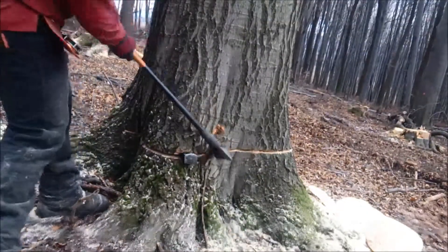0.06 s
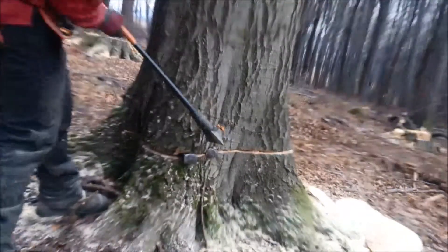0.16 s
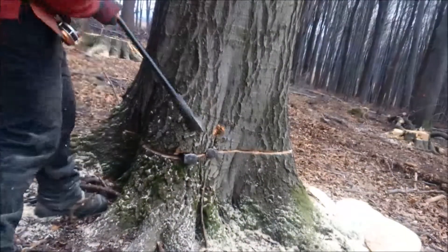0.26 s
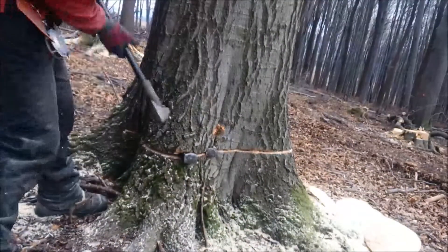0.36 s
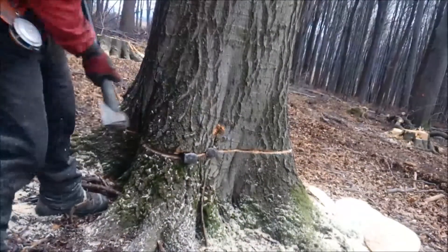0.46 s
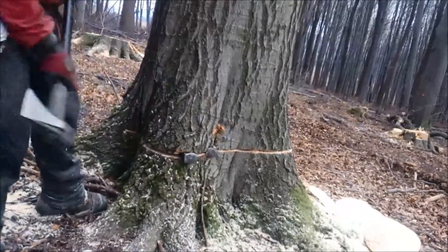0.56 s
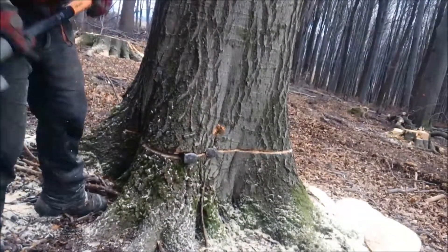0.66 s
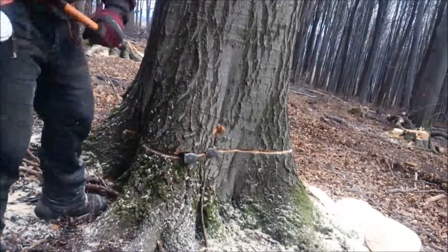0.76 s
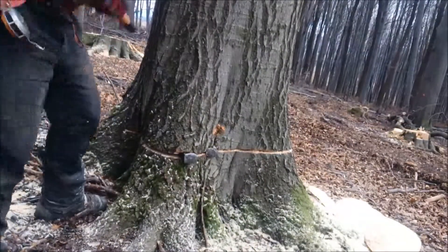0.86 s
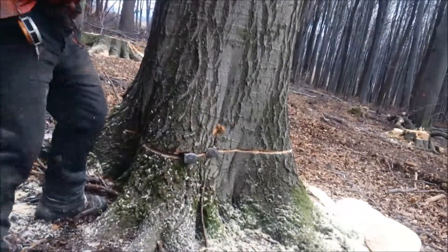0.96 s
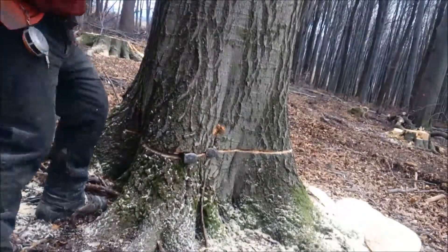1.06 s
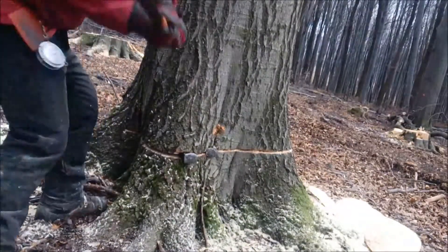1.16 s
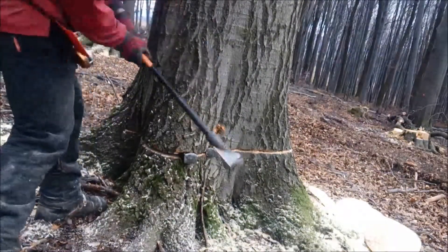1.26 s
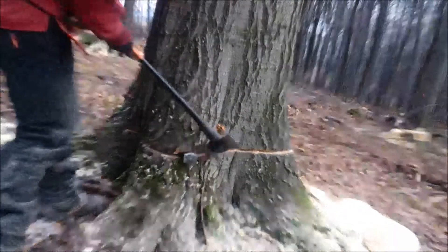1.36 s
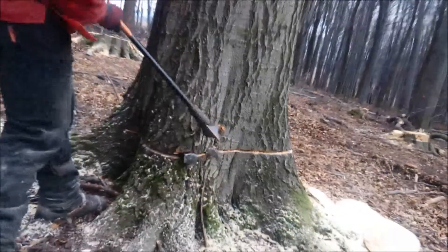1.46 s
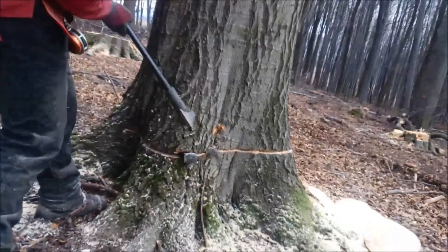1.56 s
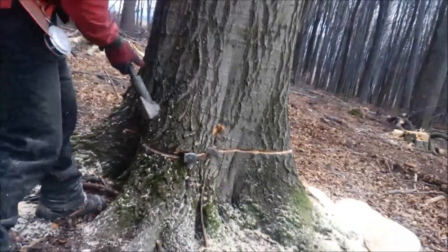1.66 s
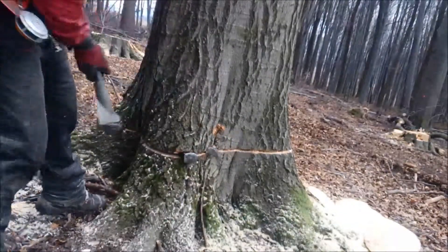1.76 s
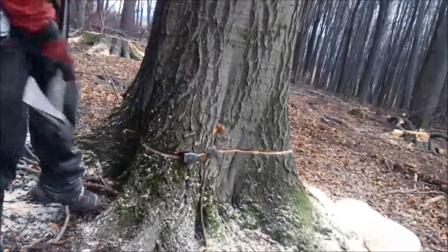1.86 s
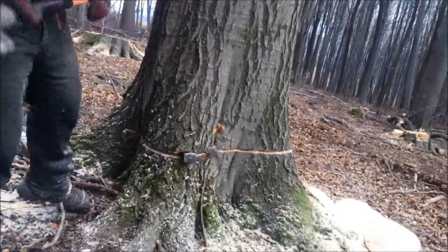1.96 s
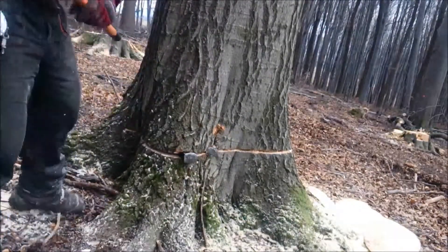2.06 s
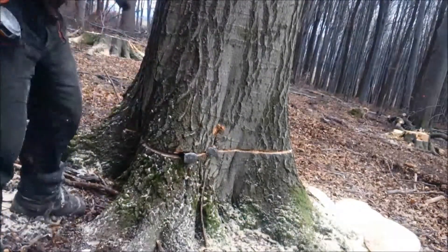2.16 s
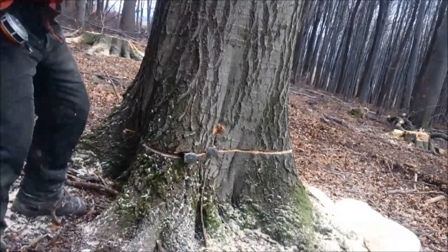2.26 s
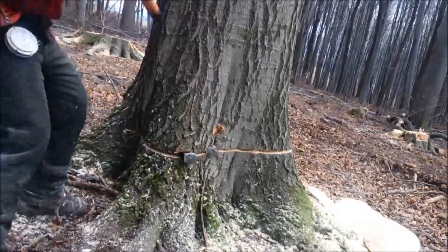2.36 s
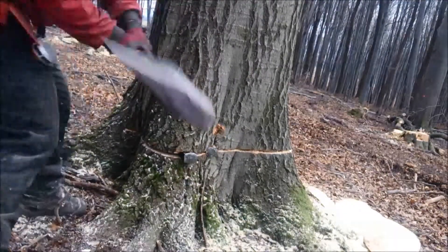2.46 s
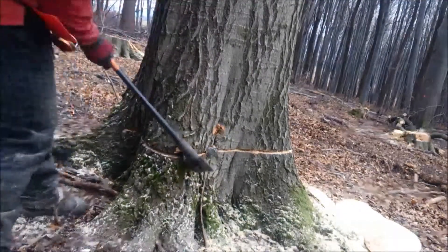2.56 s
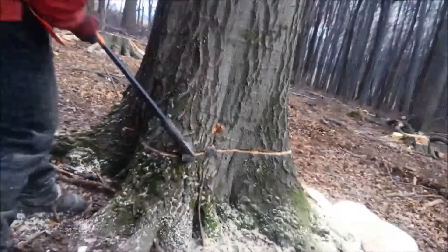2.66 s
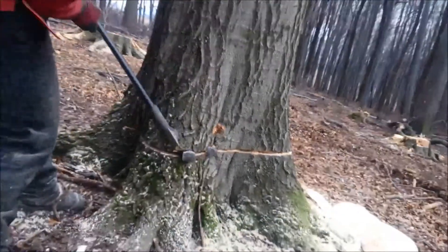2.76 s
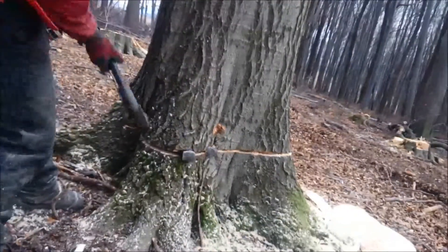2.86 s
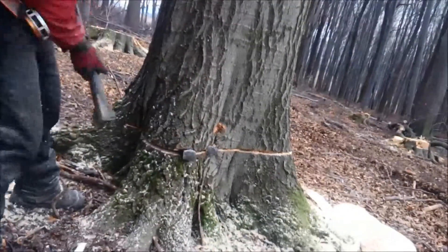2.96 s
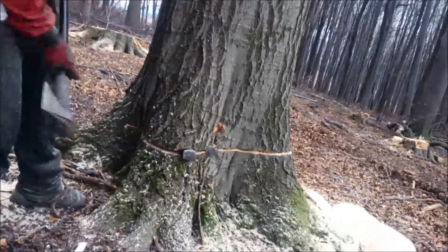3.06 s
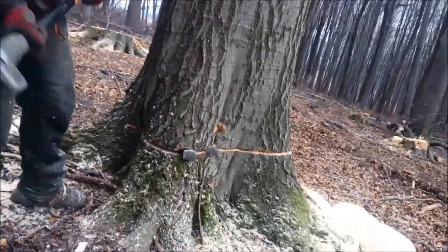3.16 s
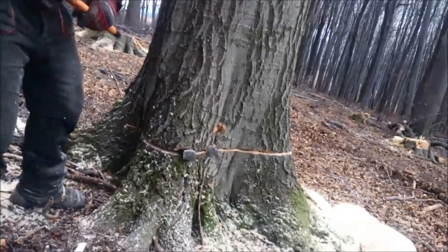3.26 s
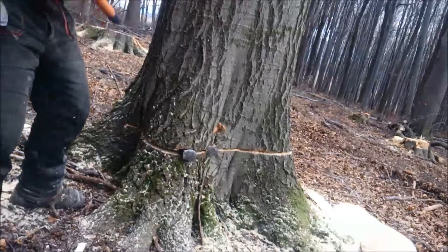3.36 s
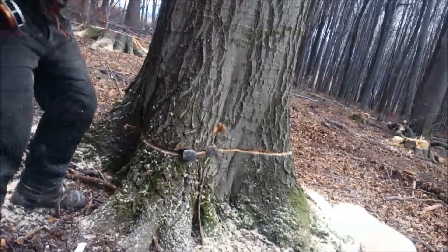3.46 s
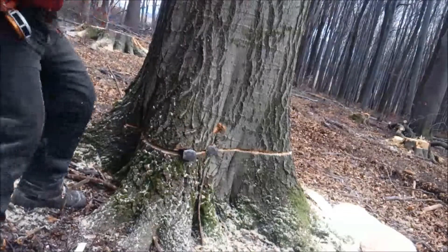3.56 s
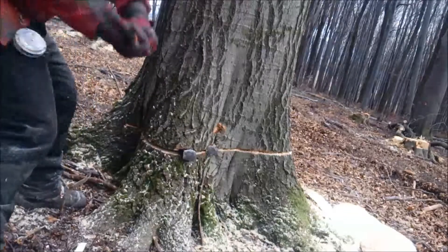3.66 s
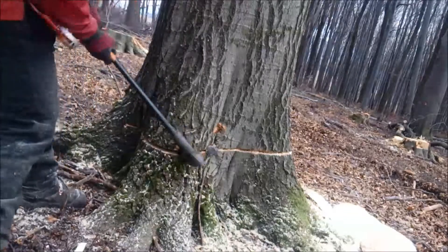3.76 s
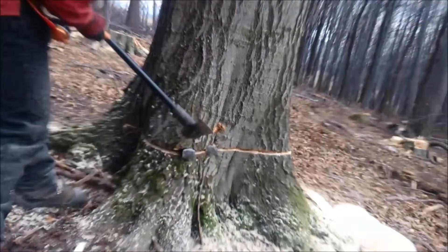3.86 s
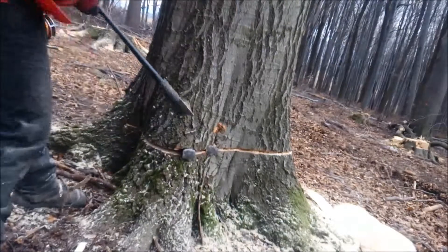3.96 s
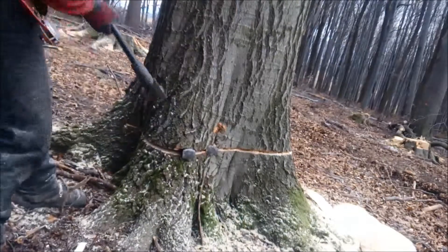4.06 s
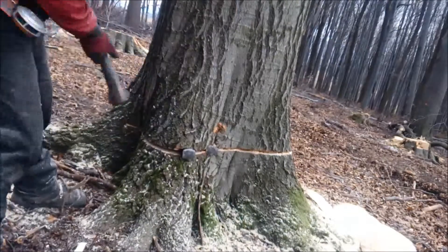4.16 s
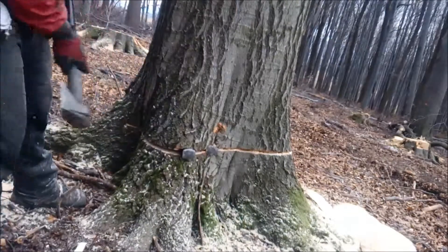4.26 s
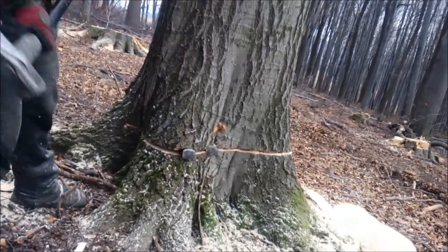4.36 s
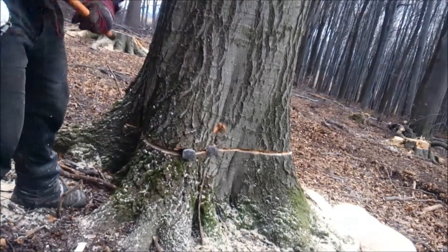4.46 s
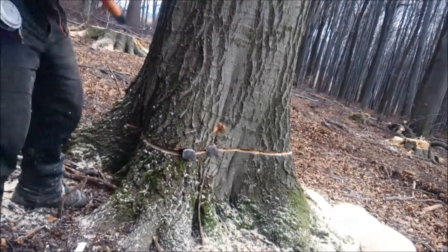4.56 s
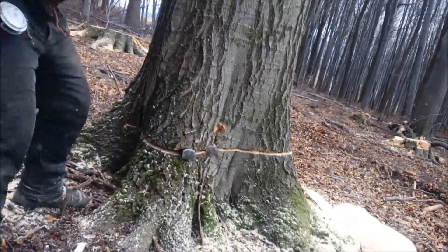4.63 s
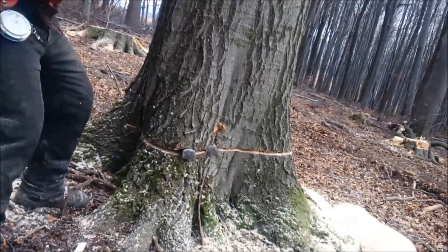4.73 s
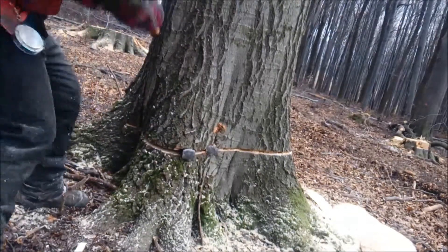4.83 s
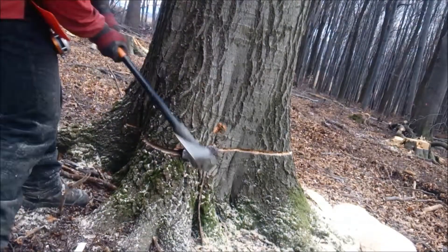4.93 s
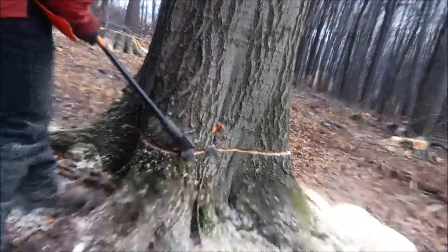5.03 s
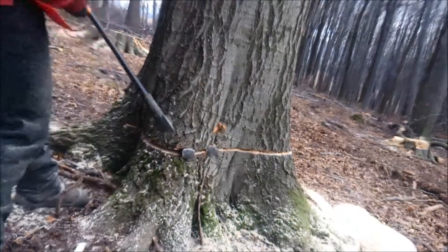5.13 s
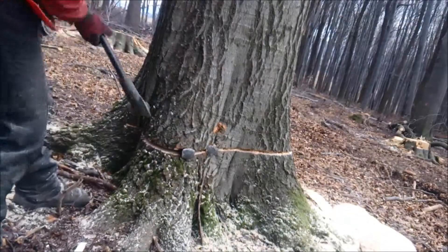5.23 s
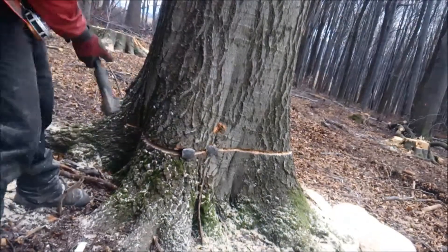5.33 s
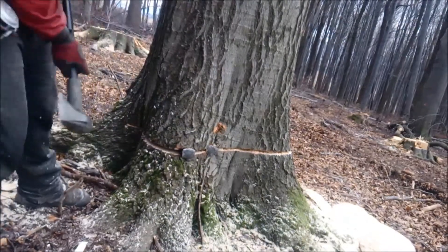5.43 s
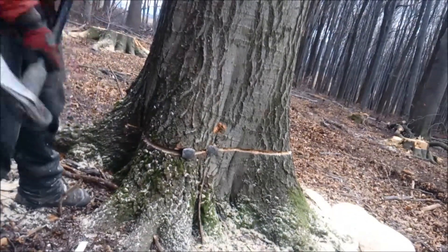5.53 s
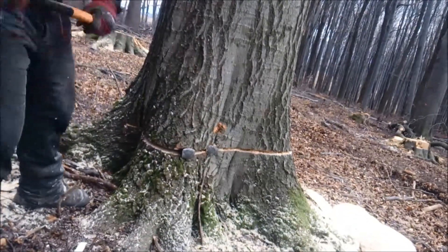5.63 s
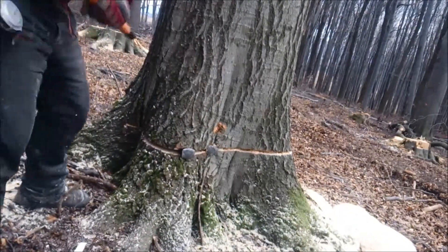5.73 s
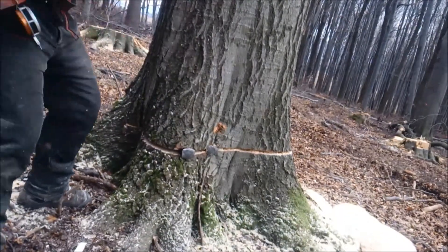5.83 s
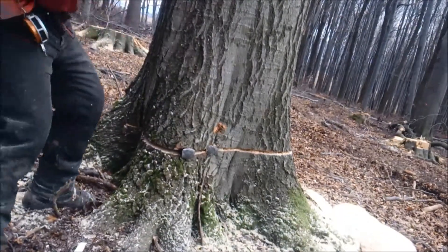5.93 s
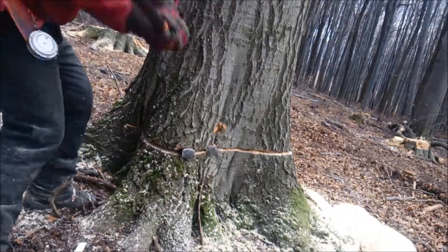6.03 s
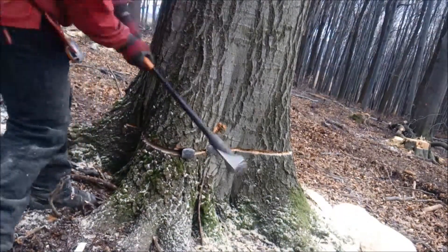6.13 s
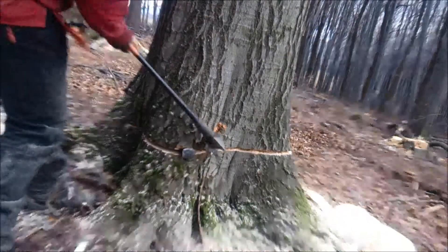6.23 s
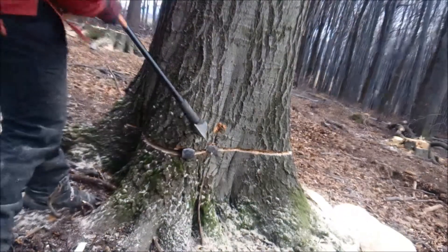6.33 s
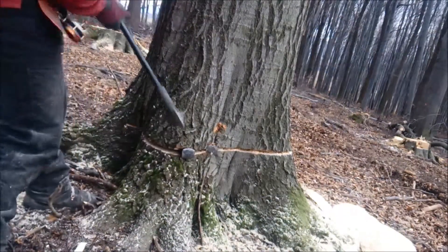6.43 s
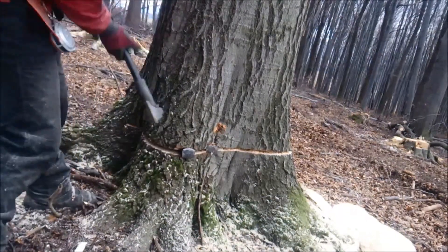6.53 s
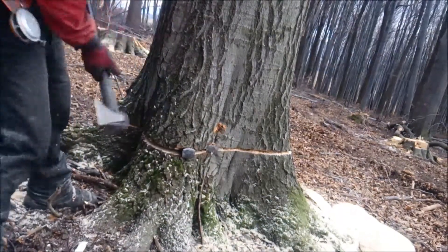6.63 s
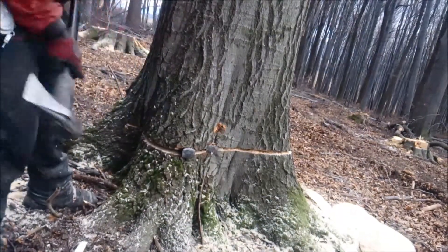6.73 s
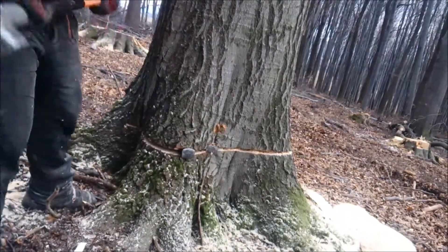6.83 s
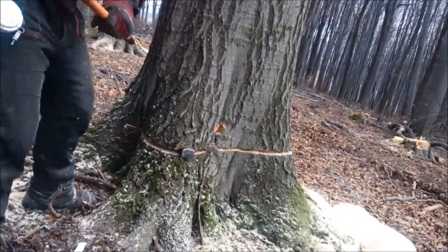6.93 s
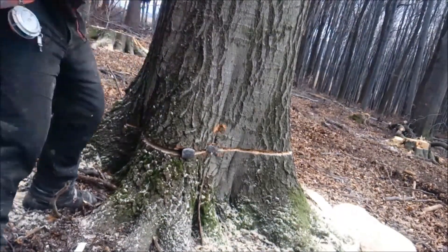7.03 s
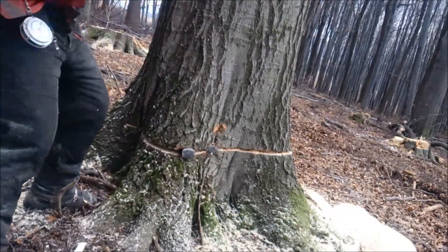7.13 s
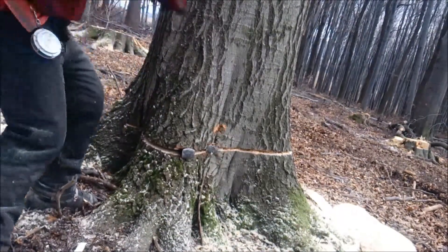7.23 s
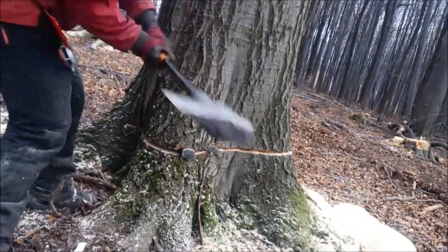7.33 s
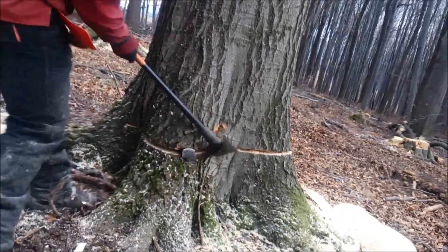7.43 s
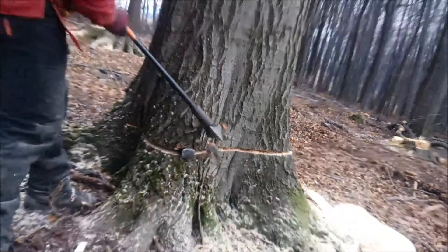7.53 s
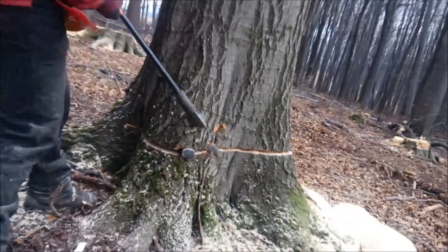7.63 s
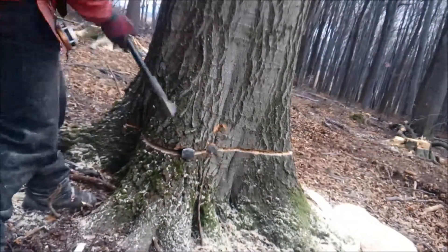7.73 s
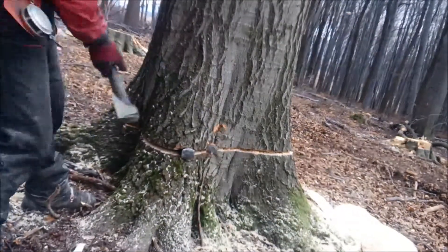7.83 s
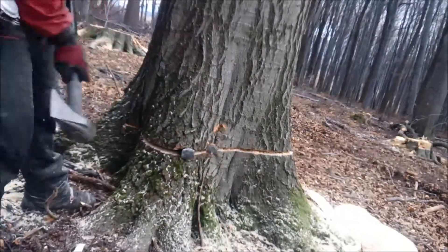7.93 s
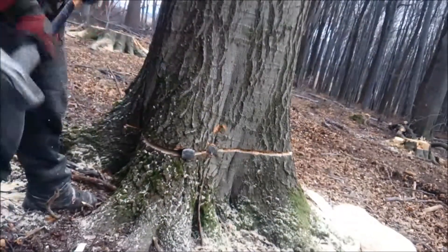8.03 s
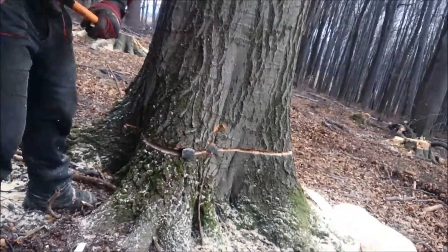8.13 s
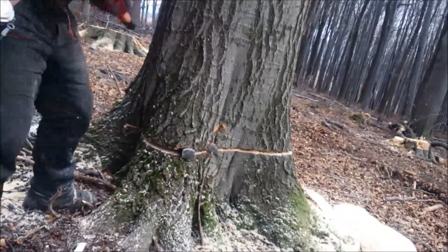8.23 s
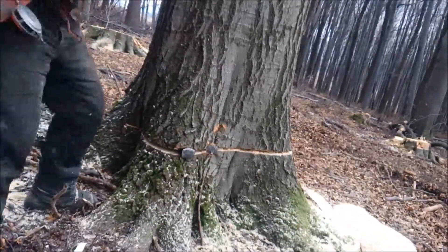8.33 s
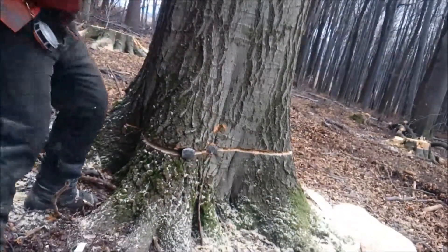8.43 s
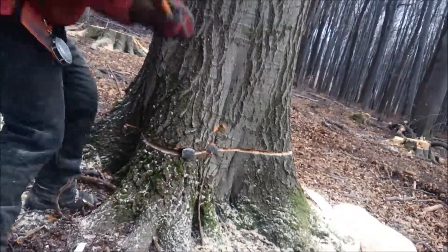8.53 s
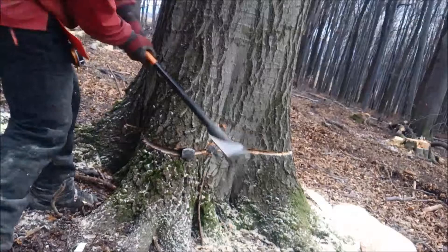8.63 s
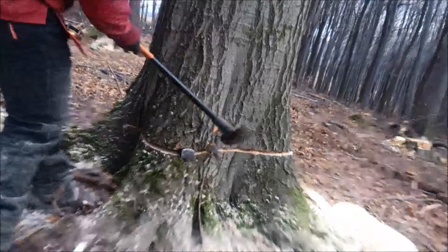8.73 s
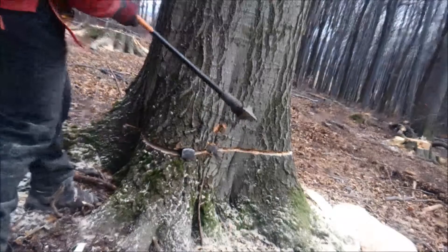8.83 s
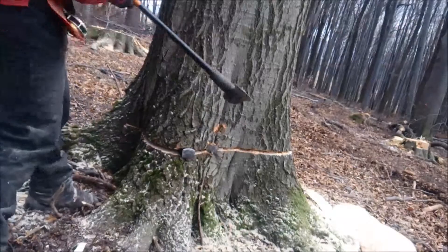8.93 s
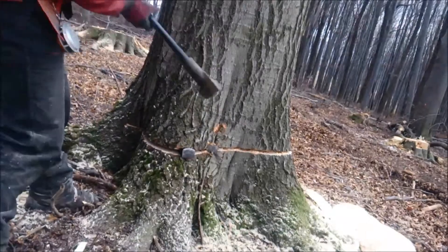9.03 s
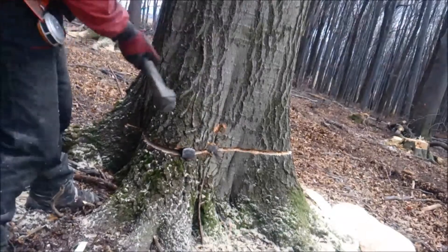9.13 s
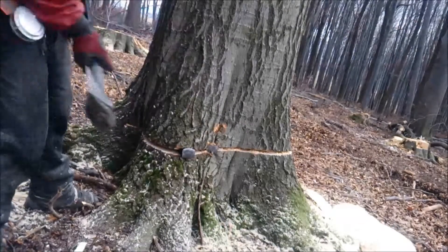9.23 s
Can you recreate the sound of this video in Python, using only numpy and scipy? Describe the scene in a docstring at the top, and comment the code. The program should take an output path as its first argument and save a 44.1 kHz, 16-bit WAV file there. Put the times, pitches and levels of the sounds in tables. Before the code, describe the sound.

Eight evenly spaced axe strikes on steel wedges in a trunk, some ringing brighter, others duller. Each is a distorted close crack with wooden body and a short shimmering ring, followed by diffuse woodland reverberation. Soft cloth hiss rises before each swing, with faint clicks and dry leaf crackles in between. Air thumps the microphone, and low gusts become stronger on the right after six seconds.

```python
"""Felling wedges driven into a beech trunk

Eight blows of a heavy axe in a bare forest, close to a stereo microphone that overloads on each.
Decaying noise makes the crack, short sine modes the trunk's thud, beating sine modes the ringing steel.
Each blow's contacts and first clang are convolved with a noise echo: the forest scatters them for over a second.
Shaped noise makes the air pushed by each swing, the rubbing sleeves, the clicks of gear, haft and dry leaves,
one knock of the rebounding axe, the gusts that buffet the right port and the still air.
"""
import sys
import numpy as np
from scipy import signal
from scipy.fft import rfft, irfft, next_fast_len
from scipy.io import wavfile

SR = 44100
rng = np.random.default_rng(int(sys.argv[2]) if len(sys.argv) > 2 else 0)


def inscribe(sig):
    """Save sig as 16-bit PCM at rate SR to the path in sys.argv[1].

    A 1-D sig is mono; a 2-D sig holds one channel per row.
    Samples are clipped to [-1, 1] before scaling.
    """
    pcm = np.round(np.clip(np.atleast_2d(sig).T, -1, 1) * 32767)
    wavfile.write(sys.argv[1], SR, pcm.astype(np.int16))


N = 409688
LENGTH = 2 * SR  # samples in one struck sound or echo
AGE = np.arange(LENGTH) / SR  # seconds since a sound began
TIME = np.arange(N) / SR  # seconds since the scene began


def undb(db):
    """Decibels to gain."""
    return 10 ** (np.asarray(db) / 20)


def fade(t60_s):
    """Exponential decay that falls 60 dB in t60_s."""
    return np.exp(-np.log(1000) * AGE / t60_s)


def rise(rise_s):
    """Exponential approach to full level."""
    return 1 - np.exp(-AGE / rise_s)


def hump(start_s, length_s, rise_s, fall_s):
    """Envelope that grows up to its start, holds for its length and dies away."""
    before = np.minimum(TIME - start_s, 0)
    after = np.maximum(TIME - start_s - length_s, 0)
    return np.exp(before / rise_s - after / fall_s)


def pan(left_minus_right_db):
    """Left and right gains for a level difference."""
    return undb(np.array([[1], [-1]]) * left_minus_right_db / 2)


def add(track, start_s, sound):
    """Mix a sound into a track at a given time."""
    i = max(int(start_s * SR), 0)
    track[:, i:i + sound.shape[1]] += sound[:, :max(track.shape[1] - i, 0)]


def walk(knots_per_s, size):
    """Random wander: straight lines between normally distributed knots."""
    knots = rng.standard_normal(int(size / SR * knots_per_s) + 2)
    return np.interp(np.arange(size) / SR * knots_per_s, np.arange(len(knots)), knots)


def noise(colour, size, alike=0.):
    """Stereo noise with the spectrum of a colour table; alike is the power share common to both sides."""
    hz, density_db = np.transpose(colour)[:2]
    padded = next_fast_len(size)
    white = rng.standard_normal((3, padded))
    sides = np.sqrt(1 - alike) * white[:2] + np.sqrt(alike) * white[2]
    log_hz = np.log(np.fft.rfftfreq(padded, 1 / SR) + 1)
    gain = undb(np.interp(log_hz, np.log(hz), density_db))
    return irfft(rfft(sides) * gain, padded)[:, :size] * np.sqrt(SR / 2)


def burst(colour, alike=0.):
    """Noise that dies away, each band of the colour table at its own pace."""
    hz, _, t60_s = np.transpose(colour)
    spectrum = rfft(noise(colour, LENGTH, alike))
    log_hz = np.log(np.fft.rfftfreq(LENGTH, 1 / SR) + 1)
    out = 0
    for band, band_t60_s in zip(np.eye(len(hz)), t60_s):
        share = np.interp(log_hz, np.log(hz), band)  # overlapping triangular bands
        out = out + irfft(spectrum * share) * fade(band_t60_s)
    return out


# crack of the contact, before each blow's gain: band_hz [Hz], density_db [dB per Hz], t60_s [s]
CRACK_COLOUR = [(40, -44.5, 0.049), (150, -41.5, 0.11), (330, -42, 0.098), (700, -45.5, 0.057),
                (1500, -42, 0.046), (3320, -40, 0.05), (6400, -46, 0.057), (8000, -41.5, 0.07),
                (9900, -50, .05), (15000, -57, 0.049)]


def crack():
    """Sharp noise of the contact; wood fibres give way in jerks, so its level is ragged."""
    return burst(CRACK_COLOUR, alike=.3) * undb(2.5 * walk(400, LENGTH))


# modes of the trunk and the wedge in the cut, before tilt and scatter:
# pitch_hz [Hz], level_db [dB], t60_s [s]
TRUNK_MODES = [(76.5, -24, 0.14), (134.6, -22, 0.11), (170, -20.5, 0.2), (218, -16.5, 0.074),
               (420, -10.5, 0.034), (520.3, -9.5, .095), (837, -5, 0.036), (892.5, -8.5, 0.058),
               (963, -10.5, 0.059), (1125, -2.5, 0.03), (1580, -4, 0.038), (2050, -10, 0.026),
               (2540, -11.5, 0.098)]


def thud(tilt_db_per_octave, scatter=0.0017, pan_db=-4):
    """Short wooden modes of the trunk; a harder contact favours the high ones."""
    out = 0
    for hz, level_db, t60_s in TRUNK_MODES:
        scattered_hz = hz * (1 + scatter * rng.standard_normal())
        wave = np.sin(2 * np.pi * (scattered_hz * AGE + rng.random()))
        tilted_db = level_db + tilt_db_per_octave * np.log2(hz / 600)
        out = out + undb(tilted_db) * fade(t60_s) * wave
    return out * pan(pan_db)


def ring(pitches_hz, modes, doppler_hz=16, wobble_hz=22, mirror=0.84, mirror_s=.007, rise_s=0.0042):
    """Steel modes; the recoil shakes their pitch and shifts their reflection off the trunk, so they beat."""
    out = np.zeros((2, LENGTH))
    for hz, (level_db, t60_s, side_db) in zip(pitches_hz, modes):
        envelope = undb(level_db) * fade(t60_s) * rise(rise_s) * pan(side_db)
        turns = np.cumsum(hz + wobble_hz * walk(120, LENGTH)) / SR + rng.random()
        direct = np.array([np.sin(2 * np.pi * turns), np.cos(2 * np.pi * turns)])
        shift_hz = doppler_hz * rng.choice([-1, 1]) * (.5 + rng.random())
        reflected = np.sin(2 * np.pi * (turns + shift_hz * AGE + rng.random((2, 1))))
        out += envelope * direct
        add(out, mirror_s, mirror * envelope * reflected)
    return out


# modes of the axe head, and a tone near 9 kHz that rings along with them, before the wobble: pitch_hz [Hz]
AXE_PITCHES = [5035, 5410, 7005, 9000, 14870]
# their ring, before each blow's gains: level_db [dB], t60_s [s], left_minus_right_db [dB]
AXE_MODES = [(-5, .08, -3.5), (-1.5, 0.11, -2.5), (-10.5, 0.34, 3), (-31, 0.24, 0.5), (-30, .11, 0)]


def axe_ring(lowest_db):
    """Ring of the axe head; the point of contact sets the balance of its lowest mode."""
    lowest = ring(AXE_PITCHES[:1], AXE_MODES[:1])
    return undb(lowest_db) * lowest + ring(AXE_PITCHES[1:], AXE_MODES[1:])


# modes of the steel wedge, before the wobble: pitch_hz [Hz]
WEDGE_PITCHES = [10346, 10280, 10420, 10350]
# their ring, before each blow's gain: level_db [dB], t60_s [s], left_minus_right_db [dB]
WEDGE_MODES = [(0.5, 0.021, 12), (-4.5, 0.069, 4), (-9, 0.033, 3), (-37, 0.39, 4)]


def wedge_ring():
    """Ring of the wedge: close modes that beat against each other."""
    return ring(WEDGE_PITCHES, WEDGE_MODES)


def contacts(again_ms, again_share, count=3):
    """The axe touches the wedge, bounces and chatters, which combs the colour of the blow."""
    train = np.zeros((2, LENGTH))
    chatter = [(.001 + .003 * when, .09) for when in rng.random(count)]
    for start_s, size in [(0, 1), (again_ms / 1000, again_share)] + chatter:
        add(train, start_s, np.full((2, 1), size))
    return train / np.linalg.norm(train[0])


# scatter from the ground and near trunks, before clumping: band_hz [Hz], density_db [dB per Hz], t60_s [s]
NEAR_SCATTER = [(100, -53, 0.62), (322, -60.5, 0.73), (900, -62.5, 0.64), (2600, -59, 0.31),
                (4570, -57.5, 0.26), (6330, -61, 0.2), (8000, -62, .4), (9900, -79, 0.26),
                (15000, -92, 0.82)]
# wash from the deep forest, before clumping: band_hz [Hz], density_db [dB per Hz], t60_s [s]
FAR_WASH = [(150, -71.5, 0.5), (348, -81, 1.5), (516, -65, 2.4), (660, -70.5, 1.9), (900, -66, 1.91),
            (2730, -65.5, 1.57), (3660, -69.5, 1.26), (5080, -64, 0.93), (6240, -73.5, 1),
            (8700, -75.5, .8), (11000, -100, 0.49)]
# single trunks that answer each blow: delay_s [s], level_db [dB over the surrounding echoes]
ANSWERING_TRUNKS = [(0.055, 6.5), (0.133, 2.5), (0.174, 6), (0.229, 2), (0.314, -4.5)]


def forest(build_s=0.099, pan_db=-3, echo_width_s=0.0045):
    """Echo response of the wood: near reflections, answers from single trunks, then a wash from far ones."""
    clumps_db = 2.4 * np.array([walk(220, LENGTH), walk(220, LENGTH)])
    for delay_s, level_db in ANSWERING_TRUNKS:
        clumps_db = clumps_db + level_db * np.exp(-((AGE - delay_s) / echo_width_s) ** 2)
    near = burst(NEAR_SCATTER) * rise(0.0083)
    far = burst(FAR_WASH) * rise(build_s)
    return (near + far) * undb(clumps_db) * pan(pan_db)


# axe blows, close to the microphone; levels are gains on each part:
# start_s [s], crack_db [dB], thud_db [dB], thud_tilt [dB per octave], axe_db [dB],
# lowest_db [dB, extra on the lowest axe mode], wedge_db [dB], forest_db [dB],
# again_ms [ms to the second contact], again_share [0-1], push_db [dB, air pushed by the swing]
AXE_BLOWS = [(0.1570, 1, -0.5, -0.5, -5.5, -4.5, -0.5, -1.5, 0.65, 0.14, -25.5),
             (1.4402, 3, 2.5, -1.5, 5.5, 2, 2.5, 0.5, 0.59, 0.21, -34),
             (2.6986, 1, 1, -1.5, -4.5, 5, -4.5, -0.5, 0.91, 0.15, -29),
             (3.9001, 2, 2, -1.5, 5.5, 1.5, -17, 2.5, 1.2, 0.42, -31.5),
             (5.1130, 2, 0.5, -2, 0, 2, -13, 3, 1.135, 0.35, -34.5),
             (6.3250, -0.5, -2, 0, -5.5, -5.5, 7, 0, 0.968, 0.42, -33),
             (7.5463, 2, 0.5, -1, -1, -13.5, 4, 1, 0.73, 0.23, -31.5),
             (8.8220, 0, 1.5, 0, -2.5, 3.5, -10.5, 0.5, 0.85, 0.12, -23)]
BLOW_TIMES = [start_s for start_s, *_ in AXE_BLOWS]


def blows(echo_s=0.019, echo_db=-8, echo_pan_db=-9, clang_db=-14, crack_pan_db=1):
    """Each blow cracks, thuds and rings, and the forest returns its contacts and its first clang."""
    out, sent = np.zeros((2, N)), np.zeros((2, N))
    for (start_s, crack_db, thud_db, tilt_db, axe_db, lowest_db, wedge_db,
         forest_db, again_ms, again_share, _) in AXE_BLOWS:
        cracked = undb(crack_db) * crack()
        axe = axe_ring(lowest_db)
        wedge = undb(wedge_db) * wedge_ring()
        body = cracked * pan(crack_pan_db) + undb(thud_db) * thud(tilt_db)
        body[0] = np.roll(body[0], 8)  # the sound of the trunk reaches the left side 8 samples later
        add(out, start_s, body + undb(axe_db) * axe + wedge)
        # first strong reflection, from the right, with the sides swapped
        add(out, start_s + echo_s, cracked[::-1] * undb(echo_db) * pan(echo_pan_db))
        first_clang = undb(clang_db) * (axe + wedge) * fade(.022)
        add(sent, start_s, undb(forest_db) * (contacts(again_ms, again_share) + first_clang))
    return out + signal.fftconvolve(sent, forest(), axes=1)[:, :N]


# slow pressure swell of moving air, before its envelope: band_hz [Hz], density_db [dB per Hz]
SWELL_COLOUR = [(8, -11.5), (25, -12), (60, -21), (110, -36.5), (200, -50.5), (400, -70), (1000, -100)]
# faster eddies of moving air, before their envelope: band_hz [Hz], density_db [dB per Hz]
EDDY_COLOUR = [(30, -29), (80, -19), (150, -24.5), (280, -39), (500, -52.5), (1500, -94.5)]
PUSH_EDDY_DB, PUSH_AFTER_S, PUSH_RISE_S, PUSH_FALL_S = -36, .012, 0.026, 0.035
WAKE_DB, WAKE_EDDY_DB, WAKE_AFTER_S, WAKE_RISE_S, WAKE_FALL_S = -46, -55.5, 0.22, 0.14, 0.14


def draught(push_pan_db=6, wake_pan_db=3, flutter_db=4):
    """Every swing pushes air ahead of it and leaves a wake that drifts over both ports."""
    pushes = [hump(s + PUSH_AFTER_S, 0, PUSH_RISE_S, PUSH_FALL_S) for s in BLOW_TIMES]
    push = sum(undb(push_db) * shape for shape, (*_, push_db) in zip(pushes, AXE_BLOWS))
    wake = sum(hump(s + WAKE_AFTER_S, 0, WAKE_RISE_S, WAKE_FALL_S) for s in BLOW_TIMES)
    wake = wake * undb(flutter_db * walk(12, N))
    swell = push * pan(push_pan_db) + undb(WAKE_DB) * wake * pan(wake_pan_db)
    push_eddies = undb(PUSH_EDDY_DB) * sum(pushes) ** 2
    wake_eddies = undb(WAKE_EDDY_DB) * wake ** 2 * pan(wake_pan_db)
    eddies = push_eddies + wake_eddies
    return swell * noise(SWELL_COLOUR, N, alike=.6) + eddies * noise(EDDY_COLOUR, N, alike=.13)


# the louder clicks of gear and haft, and the knock of the axe rebounding onto the wedge at 6.482 s;
# levels are gains on the two colours below:
# start_s [s], level_db [dB], body_db [dB, low body against the top], t60_s [s]
LOUDER_CLICKS = [(0.111, -3, -7, 0.078), (0.594, -1.5, -14, 0.034), (0.876, -3.5, -21, 0.018),
                 (1.333, 0, -7.5, 0.028), (2.65, -1, -16, 0.081), (3.125, -1, -20, 0.027),
                 (3.182, -1, -22, 0.021), (3.353, -3.5, -22, 0.015), (3.777, -2, -4.5, 0.053),
                 (3.851, 10, -6, 0.024), (4.361, -6, -18, 0.028), (4.559, 4.5, 8, 0.036),
                 (5.040, 7, -9.5, 0.024), (5.780, -3.5, -19, 0.026), (6.235, -5, -9, 0.06),
                 (6.252, 2, -24, 0.04), (6.482, 10.5, 20, 0.03), (6.725, 13, -15, 0.022),
                 (7.415, 6.5, 1.5, 0.05), (7.469, -3.5, -21, 0.082), (8.378, 0, -24.5, 0.026),
                 (8.436, 2, -8, 0.059), (8.769, 4.5, -17, 0.034), (9.246, 9.5, -16, 0.015)]
# bright top of a click, before its gain: band_hz [Hz], density_db [dB per Hz]
CLICK_TOP_COLOUR = [(500, -105), (1800, -85), (3000, -77), (5000, -79.5), (8000, -73.5), (10500, -89),
                    (15000, -89)]
# low body of a click, before its gains: band_hz [Hz], density_db [dB per Hz]
CLICK_BODY_COLOUR = [(150, -94.5), (450, -75), (1200, -75), (2500, -84), (6000, -105)]
# a soft, dull knock in every downswing
KNOCK_LEAD_S, KNOCK_DB, KNOCK_BODY_DB, KNOCK_T60_S = 0.089, -24, 16, 0.043
# leaves tick underfoot as the stance shifts after each blow
SHIFT_AFTER_S, SHIFT_LENGTH_S = .42, 0.4


def clicks(rough_db=3, tail_db=-32, tail_t60_s=.25, leaf_db=-14, leaf_spread_db=8,
           leaf_body_db=-20, leaf_t60_s=0.021, leaves_per_blow=3):
    """Short ragged ticks, some with a dull knock under them, and faint random leaf crackles."""
    out, size = np.zeros((2, N)), LENGTH // 4
    knocks = [(s - KNOCK_LEAD_S, KNOCK_DB, KNOCK_BODY_DB, KNOCK_T60_S) for s in BLOW_TIMES]
    leaves = []
    for blow_s in BLOW_TIMES:
        for when, strength in rng.random((leaves_per_blow, 2)):
            leaf_s = blow_s + SHIFT_AFTER_S + when * SHIFT_LENGTH_S
            leaves.append((leaf_s, leaf_db + leaf_spread_db * strength, leaf_body_db, leaf_t60_s))
    for start_s, level_db, body_db, t60_s in LOUDER_CLICKS + knocks + leaves:
        top = noise(CLICK_TOP_COLOUR, size, alike=0.28)
        body = undb(body_db) * noise(CLICK_BODY_COLOUR, size, alike=0.61)
        envelope = (fade(t60_s) + undb(tail_db) * fade(tail_t60_s)) * rise(.0007)
        ragged = undb(level_db + rough_db * walk(400, size))
        add(out, start_s, (top + body) * envelope[:size] * ragged)
    return out


# gusts that catch the right microphone port; levels are gains on the swell and eddy colours:
# start_s [s], length_s [s], swell_db [dB], eddies_db [dB, before flutter]
PORT_GUSTS = [(1.025, .16, -37, -50.5), (2.323, .07, -43, -63), (3.056, 0.16, -33, -40),
              (3.352, 0.045, -33, -40), (3.487, .06, -36.5, -42), (3.781, .1, -37, -37),
              (4.576, 0.08, -36.5, -53), (5.676, 0.12, -40.5, -45.5), (6.467, 0.078, -25, -23),
              (6.58, 0.058, -31, -31), (6.699, 0.062, -27, -20), (6.876, 0.065, -35, -29.5),
              (7.199, 0.067, -34.5, -46), (7.843, 0.12, -32, -36.5), (8.041, 0.11, -35, -37),
              (8.251, 0.12, -33.5, -37), (8.485, 0.073, -34, -47), (9.07, 0.14, -33, -29)]
# the breeze under the gusts, which rises and falls, before BREEZE_DB and waver: time_s [s], swell_db [dB]
BREEZE_LEVEL = [(0.0, -47.5), (2.27, -57), (3.13, -47.5), (6.13, -51), (6.54, -38.5), (7.09, -49),
                (9.06, -36.5), (9.29, -36)]
GUST_RISE_S, GUST_FALL_S = 0.0085, 0.028
BREEZE_DB, BREEZE_EDDY_DB = 1, -57  # gain on the breeze; its eddies when the swell is at -45 dB
EDDY_GROWTH = 1.5  # dB of eddies per dB of swell
# the sheltered left port: its own rumble, and its share of the right port's wind
LEE_SWELL_DB, LEE_EDDY_DB, LEE_LEAK_DB = -60, -72.5, -26


def wind(flutter_db=3, waver_db=4):
    """Breeze and gusts rumble on the right port as swell and fluttering eddies; the left lies in the lee."""
    breeze_db = np.interp(TIME, *np.transpose(BREEZE_LEVEL)) + BREEZE_DB + waver_db * walk(12, N)
    swell = undb(breeze_db)
    eddies = undb(BREEZE_EDDY_DB + EDDY_GROWTH * (breeze_db + 45))
    for start_s, length_s, swell_db, eddies_db in PORT_GUSTS:
        gust = hump(start_s, length_s, GUST_RISE_S, GUST_FALL_S)
        swell = np.maximum(swell, undb(swell_db) * gust)
        eddies = np.maximum(eddies, undb(eddies_db) * gust ** 2)
    swell = np.array([undb(LEE_SWELL_DB) + undb(LEE_LEAK_DB) * swell, swell])
    eddies = np.array([undb(LEE_EDDY_DB) + undb(LEE_LEAK_DB) * eddies, eddies])
    eddies = eddies * undb(flutter_db * walk(30, N))
    return swell * noise(SWELL_COLOUR, N, alike=.4) + eddies * noise(EDDY_COLOUR, N, alike=.13)


# sleeves rub as the axe is drawn back, then louder as it is lifted:
# lead_s [s before the blow], length_s [s], level_db [dB, gain on the hiss]
SLEEVE_RUBS = [(.9, 0.362, -7.5), (0.461, .12, 2)]
# hiss, before its gain: band_hz [Hz], density_db [dB per Hz]
HISS_COLOUR = [(1000, -110), (4000, -102), (6500, -98.5), (8300, -91.5), (10000, -106), (12000, -106),
               (15000, -109)]
RUB_RISE_S, RUB_FALL_S = .04, 0.0091


def sleeves(rest_db=-11, rough_db=2.5):
    """Hiss of sleeves that builds with each lift and drops to a faint rest level at the top of the swing."""
    rub = 0
    for blow_s in BLOW_TIMES:
        for lead_s, length_s, level_db in SLEEVE_RUBS:
            rub = rub + undb(level_db) * hump(blow_s - lead_s, length_s, RUB_RISE_S, RUB_FALL_S)
    return noise(HISS_COLOUR, N) * np.hypot(undb(rest_db), rub) * undb(rough_db * walk(18, N))


# still air, before its slight waver: band_hz [Hz], density_db [dB per Hz]
AIR_COLOUR = [(50, -84), (200, -87.5), (500, -93.5), (1500, -100), (3500, -110), (8000, -111),
              (11000, -119), (16000, -120)]


def air():
    """Quiet forest air: dark noise whose level wavers slightly."""
    return noise(AIR_COLOUR, N, alike=0.14) * undb(1.2 * walk(10, N))


def scene():
    """Blows and their draught, small clicks, wind, sleeves and air."""
    return blows() + draught() + clicks() + wind() + sleeves() + air()


def record(dry, ceiling=0.78, top_hz=15850):
    """The microphone saturates on each blow; the top is cut off."""
    fine = signal.resample_poly(dry, 2, 1, axis=1)  # double rate, against aliasing
    saturated = ceiling * np.tanh(fine / ceiling)
    clipped = signal.resample_poly(saturated, 1, 2, axis=1)
    lowpass = signal.ellip(8, .2, 70, top_hz, fs=SR, output="sos")
    return signal.sosfilt(lowpass, clipped)


dry = scene()
out = record(dry)
inscribe(out)
```